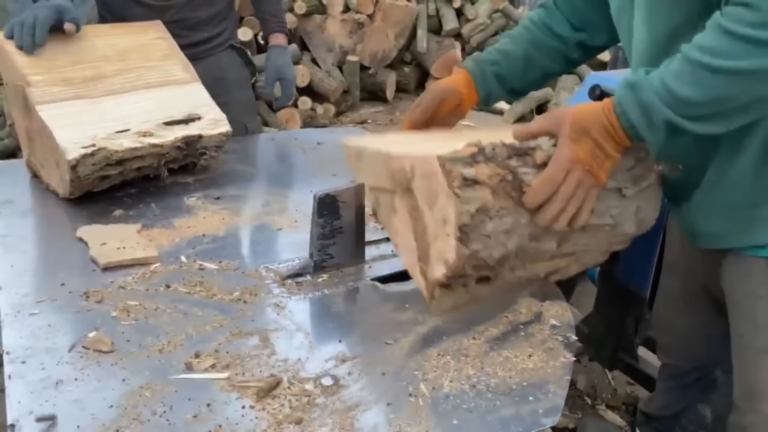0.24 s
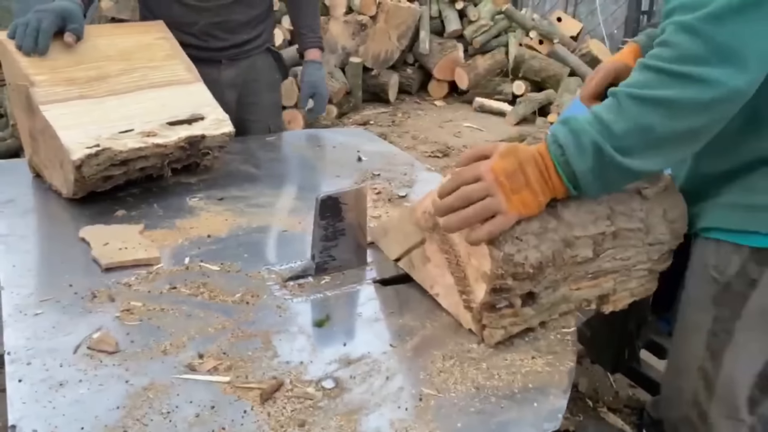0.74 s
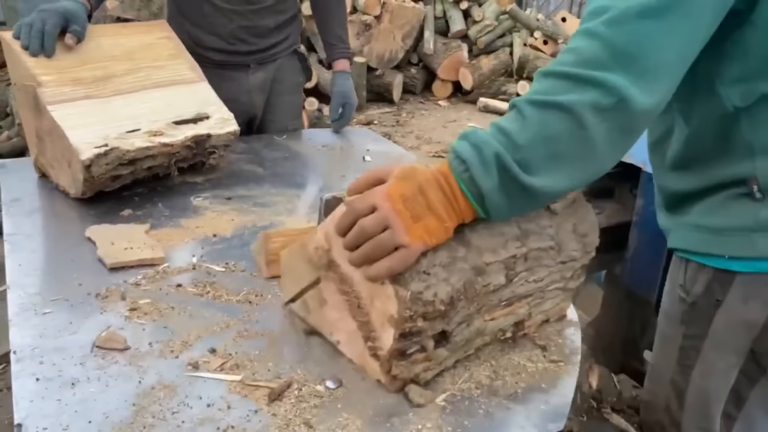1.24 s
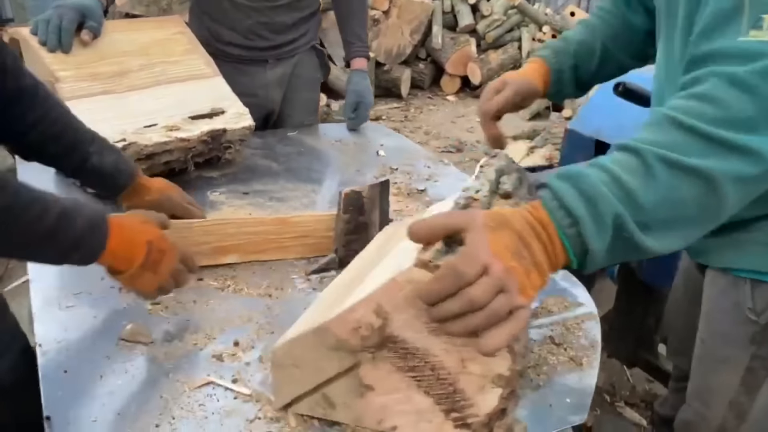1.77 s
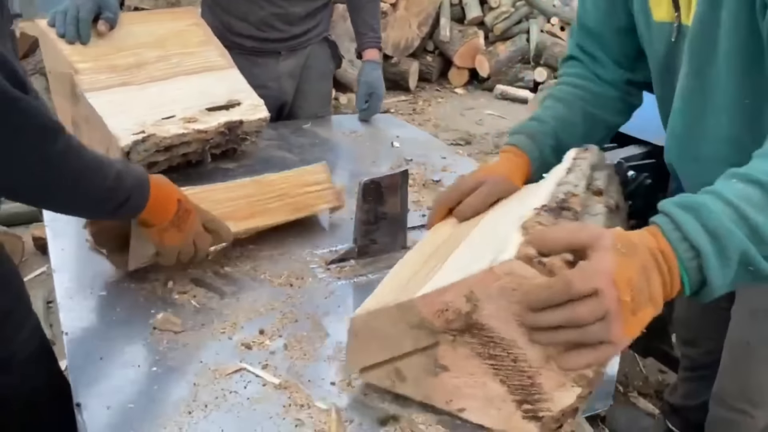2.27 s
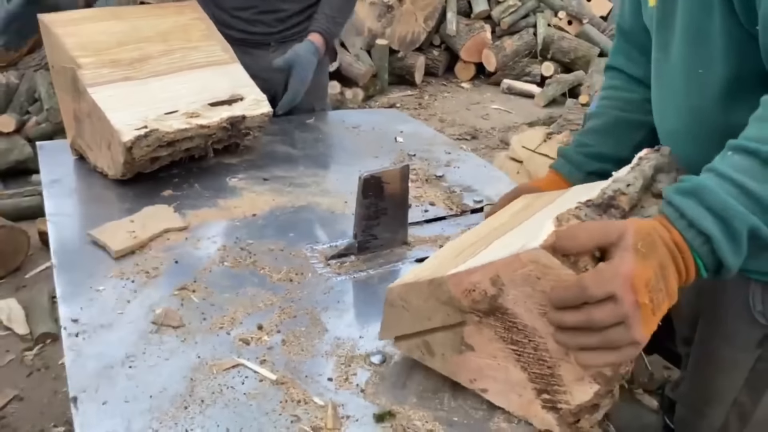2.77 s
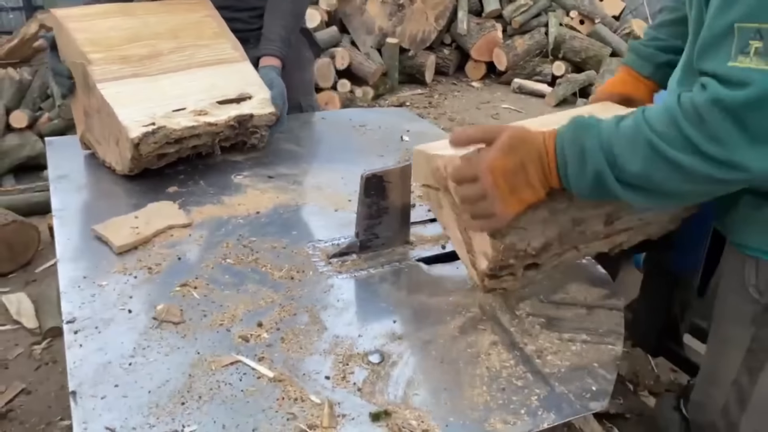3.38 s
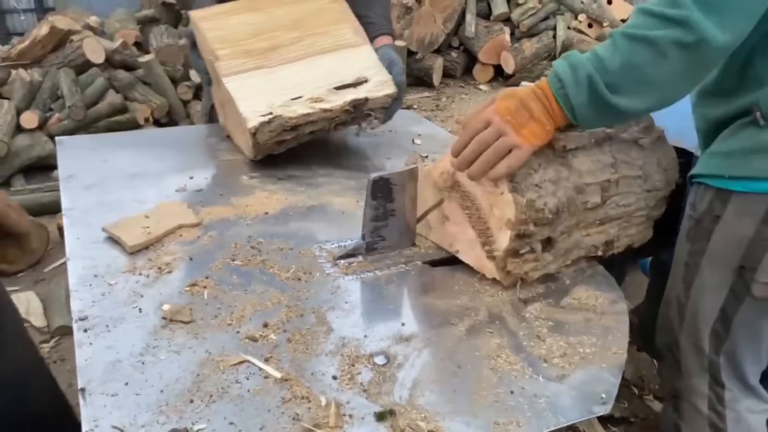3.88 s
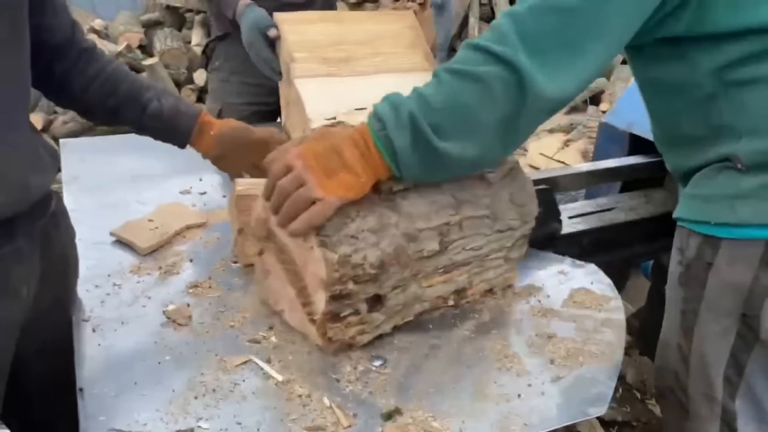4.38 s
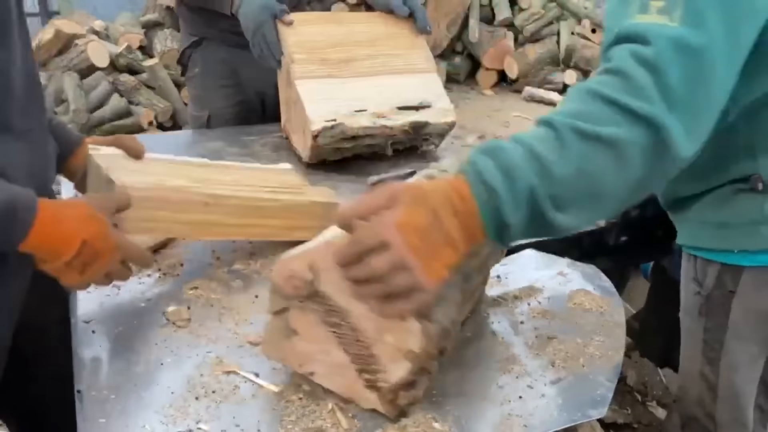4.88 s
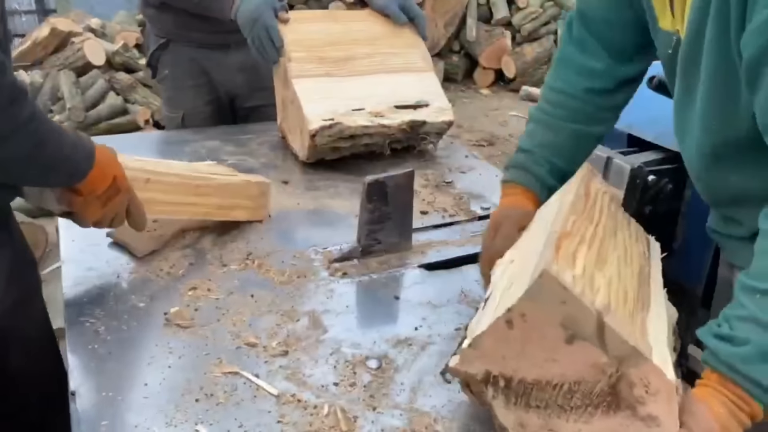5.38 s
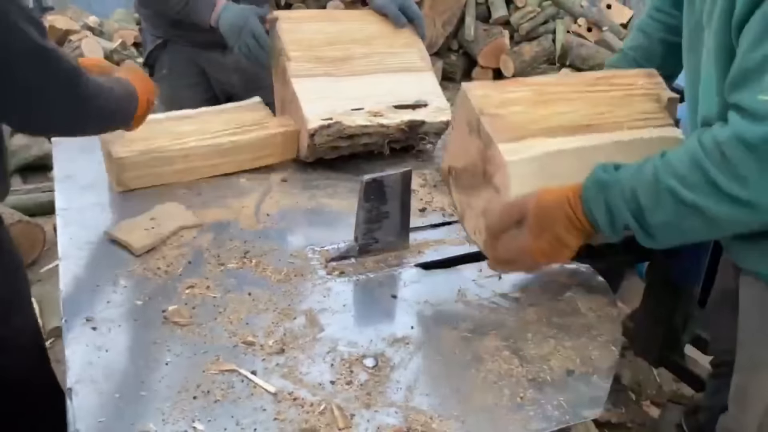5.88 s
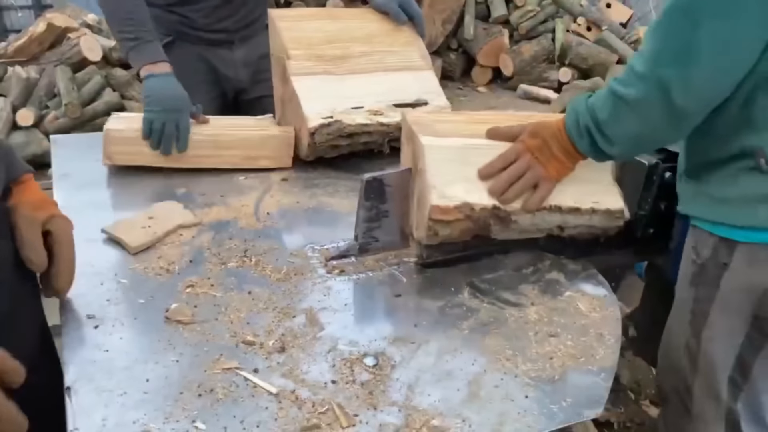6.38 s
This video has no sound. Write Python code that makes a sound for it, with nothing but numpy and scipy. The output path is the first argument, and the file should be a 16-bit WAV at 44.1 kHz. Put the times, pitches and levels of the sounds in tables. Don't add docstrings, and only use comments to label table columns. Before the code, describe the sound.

Rough wood scrapes and booming knocks on a metal table, with short rings and chip hiss, above a log splitter's steady drone.

```python
import sys
import numpy as np
from scipy import signal
from scipy.fft import rfft, irfft, next_fast_len
from scipy.io import wavfile
from scipy.ndimage import uniform_filter1d

SR = 44100
rng = np.random.default_rng(int(sys.argv[2]) if len(sys.argv) > 2 else 0)


def log_audio(samples):
    frames = np.atleast_2d(samples).T
    limited = np.clip(frames, -1, 1)
    pcm = np.round(limited * 32767).astype(np.int16)
    wavfile.write(sys.argv[1], SR, pcm)


def volts(x):
    e = np.asarray(x, float) / 20
    return 10 ** e


N = 292383

# (frequency [Hz], level [dB per Hz])
RUSH_COLOUR = [(25, -32), (60, -13), (100, -8), (250, -12), (700, -24), (1500, -26), (2500, -28),
               (3200, -25.5), (5000, -27.5), (7000, -38.5), (9300, -51), (13000, -72)]
# (frequency [Hz], width [Hz], boost [dB])
CASING_BUMPS = [(96.3, 26.5, 11.7), (144.8, 5, 17.7), (234, 100, 7), (375, 40, 6.3), (539, 22, 11.5),
                (605, 14, 13), (2166, 230, 9.8), (2432, 42, 20.4)]
# (frequency [Hz], level [dB per Hz])
DRONE_COLOUR = [(60, -32), (90, -3.5), (105, -5.5), (135, -6.5), (170, -29), (400, -69)]
# (frequency [Hz], level [dB rms])
GEAR_TONES = [(1077, -54.5), (1534, -58.5), (1615, -51.5), (2030, -61), (2153, -68), (2417, -52)]
# (time [s], pump effort [dB], frame drone [dB])
MACHINE_LOAD = [(0.0, -45.5, -38), (.37, -47.5, -53), (.75, -45.5, -29.5), (1.08, -61, -52),
                (1.29, -47.5, -48), (1.8, -45.5, -34), (2.07, -49, -19), (2.5, -50, -31),
                (2.8, -53.5, -24.5), (3.14, -51.5, -39.5), (3.53, -52.5, -39), (3.85, -56, -25.5),
                (4.41, -65.5, -23.5), (4.95, -42, -30), (5.25, -48, -33.5), (5.6, -51, -33),
                (6.1, -55, -14), (6.63, -53, -47)]

# (frequency [Hz], level [dB per Hz])
CHIP_COLOUR = [(6000, 3), (8000, -0.5), (10000, 8), (11500, -1.5), (13000, -2.5)]
# (peak time [s], level [dB], lasts [s])
CHIP_SWEEPS = [(0.217, -60, 0.2), (1.08, -54, .06), (1.4, -54, 0.35), (1.98, -40.5, 0.14),
               (2.4, -46.5, 0.26), (3.0, -64, 0.66), (3.85, -52, 0.085), (4.187, -50.5, 0.19),
               (4.75, -48, 0.1), (4.97, -39.5, 0.094), (5.425, -45, 0.22), (6.185, -48, 0.091),
               (6.6, -50, 0.13)]

RING_TIMES = [-.05, -.05, -.05, .488, .6, .884, 5.612, 5.735, 5.848, 5.96, 5.9, 6.128, 5.141, 5.143, .375]
# (frequency [Hz], peak [dB], time to fall 60 dB [s], roughness [rad])
RING_TONES = [(1060, -22.5, 0.38, 1.5), (1500, -23, 0.33, 0.55), (620, -26, 0.49, .5),
              (3555, -19.5, 0.11, 3), (3070, -25, 0.068, 2.3), (1430, -13, 0.11, 1.8),
              (136, -6.5, 0.11, 0.42), (151, -12, 0.13, 0.46), (199, -5, 0.094, .4),
              (600, -17.5, 0.2, 0.53), (131.5, -13.5, .4, .5), (133, -11, 0.49, .5),
              (1266, -17.5, 0.23, 1.2), (2000, -17.5, 0.099, 1.1), (236, -12, 0.22, 0.52)]

# (frequency [Hz], level [dB per Hz])
BOOM_COLOUR = [(25, -57.5), (45, -14.5), (70, -3.5), (110, -2.5), (220, -1.5), (330, -8.5), (600, -43)]
KNOCK_COLOUR = [(150, -41), (300, -1), (600, 0.5), (900, -8), (1300, -32), (2500, -59)]
CLATTER_COLOUR = [(400, -51.5), (950, -3.5), (1500, -4.5), (2400, -8.5), (3100, -12), (5000, -54.5)]
RATTLE_COLOUR = [(1500, -48.5), (2800, -3.5), (3300, -3), (5000, 0.5), (6500, -7.5), (8000, -14.5),
                 (9300, -18.5), (11500, -17), (13000, -43.5)]
# (frequency [Hz], width [Hz], boost [dB])
SHEET_BUMPS = [(95, 25, 4), (133, 22, 5), (210, 35, 5), (280, 30, 3), (388, 25, 4), (452, 20, 4),
               (610, 30, 4), (870, 80, 3), (1225, 60, 3), (1420, 90, 2), (1640, 30, 3), (2010, 60, 3),
               (3420, 50, 5), (4560, 60, 5.5), (4870, 45, 6), (5120, 60, 5), (5900, 70, 5)]

# (peak time [s], level [dB], weight [dB], hardness [dB], lasts [s])
DRAG_STROKES = [(0.007, -32.5, 1.5, -13, 0.063), (0.452, -24.5, -6, -10.5, .06),
                (0.654, -31.5, 2.5, -11.5, .15), (1.051, -24, -8, -21, 0.069),
                (1.292, -28, 1.5, -8.5, 0.13), (1.62, -28.5, -0.5, -27, 0.16),
                (1.854, -25, -0.5, -7.5, 0.21), (2.05, -29, 7, -9, 0.033), (2.423, -42.5, 3, 0.5, 0.16),
                (2.798, -45.5, 5, -3.5, 0.38), (3.464, -40, 4, -11, 0.065), (3.633, -29, 16.5, -2, 0.031),
                (3.7, -22, 1, -11, 0.048), (3.958, -19, -3, -5.5, .06), (4.21, -25, 2, -6.5, .1),
                (4.39, -28.5, 3.5, -4, 0.13), (4.768, -24.5, -2.5, -11, 0.083),
                (4.96, -21.5, 0, -5.5, 0.072), (5.171, -25.5, -7, -9, 0.072), (6.4, -36, 4, -6, 0.069)]
# (peak time [s], level [dB], weight [dB], hardness [dB], lasts [s])
BARK_RASPS = [
    (5.53, -36, -4, -8, 0.078),
    (5.78, -31, 5.5, -10, 0.096),
    (5.93, -24, 1, -10, 0.055),
    (6.05, -28, 0, -13.5, 0.077),
    (6.16, -24.5, 7.5, -9, 0.047),
    (6.27, -24.5, 1, -9.5, 0.036),
]
# (time [s], level [dB], weight [dB], hardness [dB], contact lasts [s])
STEEL_SLAMS = [(.262, -12.5, 3, 1.5, 0.011), (.373, -18.5, 3, 3, 0.017), (.881, -8.5, -8, -3, 0.018),
               (.932, -16.5, 0.5, -5.5, 0.055), (1.001, -11, -31, 1, 0.01), (1.927, -15, 3, -2.5, 0.027),
               (3.53, -16.5, 2.5, -3, 0.033), (3.574, -14.5, -2.5, 1.5, 0.029), (3.839, -11, -5, -4, 0.05),
               (3.946, -28.5, -9, 10, 0.01), (3.965, -15.5, -28, 5.5, 0.0069),
               (5.833, -18.5, 5.5, -7, 0.061), (6.118, -22.5, 4, -2.5, 0.042),
               (6.511, -6.5, -5.5, -4, 0.021), (6.606, -21, 5, 1, 0.027)]
# (time [s], level [dB], weight [dB], hardness [dB], contact lasts [s])
LIGHT_JOLTS = [(.485, -43, -19, 19, .0061), (1.568, -23.5, -3, -2, 0.018), (1.83, -37, -8, 6, .02),
               (2.365, -37, -8, -3, 0.0092), (2.445, -28, -11, -9, 0.041), (3.108, -51, 6, 14, 0.0078),
               (4.415, -20, -4, -8, 0.042), (4.943, -22, -4, -1, 0.016), (5.607, -42.5, 20, 7, 0.028),
               (5.729, -26.5, 5, -21, 0.017), (5.965, -19, 4.5, -15, .01)]
# (time [s], level [dB], weight [dB], hardness [dB], contact lasts [s])
WOOD_CLACKS = [
    (.361, -9, -9, -11, 0.013),
    (1.437, -24.5, -15, -6.5, 0.043),
    (4.46, -19, 2, -4, 0.05),
    (5.138, -17, -6, 0, 0.02),
]

# (frequency [Hz], likeness [-1..1])
MIC_LIKENESS = [(180, 1), (320, 0.96), (480, 0.59), (1300, 0.4), (3200, 0.43), (3600, 0.29), (4900, 0.088),
                (5450, 0.029), (6000, 0.92), (7100, 0.54), (7900, 0.27), (8600, -0.91), (9700, -0.91),
                (10100, -.3), (10500, 0.99)]
# (frequency [Hz], left over right [dB])
MIC_BALANCE = [(350, 0), (700, 3), (1700, 0), (2250, -3.5), (3700, 2), (5500, -2.5), (7500, 0.5),
               (10000, 1)]
# (frequency [Hz], right behind left [rad])
MIC_LAG = [(330, 0), (670, .7), (1750, -.6), (2400, 1.5), (3200, 3.14), (3800, 6), (4800, 7.1), (5450, 9.6),
           (6250, 4 * np.pi)]


def unit(x):
    return x / np.sqrt(np.mean(x ** 2) + 1e-20)


def along(points, hz):
    f, v = np.transpose(points)
    return np.interp(np.log(hz + 1), np.log(f + 1), v)


def curves(rows):
    s, *cols = np.transpose(rows)
    t = np.arange(N) / SR
    return np.array([np.interp(t, s, c) for c in cols])


def wobble(rate, channels=1):
    at = np.arange(N) * rate / SR
    knots = np.arange(N // 8)
    return np.array([np.interp(at, knots, rng.standard_normal(N // 8)) for _ in range(channels)])


def patchy(depth_db, bins, frames):
    z = signal.stft(rng.standard_normal((2, N)), nperseg=512)[2]
    field = rng.standard_normal(z.shape[1:])
    field = uniform_filter1d(uniform_filter1d(field, bins, 0), frames, 1)
    bass_even = np.clip(np.fft.rfftfreq(512, 1 / SR) / 1200, .15, 1)[:, None]
    gain = volts(depth_db * bass_even * unit(field))
    return unit(signal.istft(z * gain, nperseg=512)[1][:, :N])


def body(x, spectrum, peaks):
    size = 2 ** 14
    hz = np.fft.rfftfreq(size, 1 / SR)
    db = along(spectrum, hz) + sum(g / (1 + (2 * (hz - c) / w) ** 2) for c, w, g in peaks)
    cep = irfft(np.log(volts(db)))
    cep[1:size // 2] *= 2
    cep[size // 2 + 1:] = 0
    h = irfft(np.exp(rfft(cep)))
    return signal.fftconvolve(x, h[None] / np.linalg.norm(h), axes=1)[:, :N]


def swell(s, lasts):
    t = np.arange(0, N, 64) / SR
    return volts(-5.5 * np.abs((t - s) / lasts) ** 1.26)


def together(pushes):
    power = sum(p ** 2 for p in pushes)
    return np.repeat(np.sqrt(power), 64, axis=-1)[..., :N]


def motor():
    t = np.arange(N) / SR
    effort, drone_db = curves(MACHINE_LOAD)
    effort = effort - np.median(effort)
    rush = volts(-34.5 + 0.72 * effort) * body(patchy(1.43, bins=3, frames=12), RUSH_COLOUR, CASING_BUMPS)
    drone = body(volts(drone_db - 5) * rng.standard_normal((2, N)), DRONE_COLOUR, CASING_BUMPS)
    tones = 0
    for hz, db in GEAR_TONES:
        drift = (hz / 1100) ** 2 * wobble(30, channels=2)
        swell_db = -.25 * effort + 3 * wobble(9)
        tones = tones + volts(db + 1.5 + swell_db) * np.sin(2 * np.pi * hz * t + drift)
    return rush + drone + tones


def chips():
    sweep = together(volts(db) * swell(s, lasts) for s, db, lasts in CHIP_SWEEPS)
    grains = volts(3.7 * wobble(40)) * patchy(0.86, bins=3, frames=5)
    return body(sweep * grains, CHIP_COLOUR, [])


def ringing_parts():
    out = np.zeros((2, N))
    for s, (hz, db, t60, rough) in zip(RING_TIMES, RING_TONES):
        t = np.maximum(np.arange(N) / SR - s, 0)
        rise = 1 - np.exp(-t * min(hz / 1.4, 400))
        shake = rough * wobble(min(hz / 20, 400), channels=2)
        out += rise * volts(db - 60 * t / t60) * np.sin(2 * np.pi * hz * t + shake)
    return out


def regions(db, weight_db, hard_db, rattle_db):
    return volts([[db + weight_db], [db], [db + hard_db], [db + rattle_db]])


def drag_force():
    pushes = []
    for rows, loose_db in ((DRAG_STROKES, -3.5), (BARK_RASPS, 5)):
        for s, db, weight, hard, lasts in rows:
            pushes.append(regions(db, weight, hard, loose_db + hard) * swell(s, lasts))
    return together(pushes)


def blow_force():
    force = np.zeros((4, N + SR))
    t = np.arange(SR // 2) / SR
    rise = 1 - np.exp(-t / .0012)
    crack = 0.12 * volts(-60 * t / 0.0079)
    slowness = np.array([[1.4], [1.15], [.95], [.9]])
    for blows, loose_db in ((STEEL_SLAMS, -3), (LIGHT_JOLTS, -3), (WOOD_CLACKS, -17)):
        for s, db, weight, hard, lasts in blows:
            t60 = (0.069 + 4 * lasts) * slowness
            after = np.maximum(t - lasts, 0)[None] / t60
            fade = 0.38 * volts(-60 * after) + 0.21 * volts(-18 * after) + crack
            gains = regions(db, weight, hard, hard + loose_db)
            force[:, round(s * SR):][:, :len(t)] += gains * rise * fade
    return force[:, :N]


def table():
    rub = unit(volts(.9 * wobble(14) + .7 * wobble(70) + 2.3 * wobble(600)))
    bounce = unit(volts(.8 * wobble(90) + 2.6 * wobble(800)))
    strength = np.hypot(drag_force() * rub, blow_force() * bounce)
    noise = patchy(3.2, bins=2, frames=11)
    colours = (BOOM_COLOUR, KNOCK_COLOUR, CLATTER_COLOUR, RATTLE_COLOUR)
    return sum(body(level * noise, colour, SHEET_BUMPS) for level, colour in zip(strength, colours))


def scene():
    size = next_fast_len(N + 8192)
    hz = np.fft.rfftfreq(size, 1 / SR)
    turn = np.arccos(np.clip(along(MIC_LIKENESS, hz), -1, 1)) / 2
    sources = table() + chips() + ringing_parts() + motor()
    shared, opposed = rfft(sources, size) * [np.cos(turn), np.sin(turn)]
    lean = volts(along(MIC_BALANCE, hz) / 2) * np.exp(.5j * along(MIC_LAG, hz))
    return irfft([(shared + opposed) * lean, (shared - opposed) / lean], size)[:, :N]


def thinned(x, drop_db):
    hz, _, z = signal.stft([x[0] + x[1], x[0] - x[1]], SR, nperseg=1024)
    near = uniform_filter1d(uniform_filter1d(np.abs(z) ** 2, size=6, axis=1), size=3, axis=2)
    wide = np.exp(uniform_filter1d(np.log(near.clip(1e-14)), size=29, axis=1))
    keep = (near > wide * volts(2 * drop_db)) | (hz < 2950)[:, None]
    below_limit = (hz < 11780)[:, None]
    mid, side = signal.istft(z * keep * below_limit, SR, nperseg=1024)[1][:, :N]
    return np.array([mid + side, mid - side]) / 2


def low_pass(x):
    return signal.sosfilt(signal.butter(12, 12530, fs=SR, output="sos"), x)


def record(dry):
    x = thinned(dry, drop_db=-2.5)
    soft = x / (1 + np.abs(x / 1.02) ** 8) ** (1 / 8)
    return low_pass(soft)


dry = scene()
out = record(dry)
log_audio(out)
```